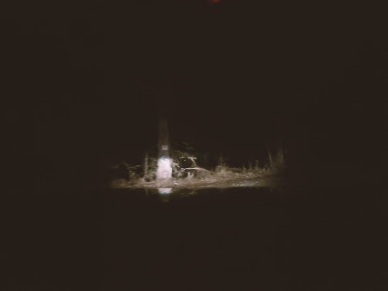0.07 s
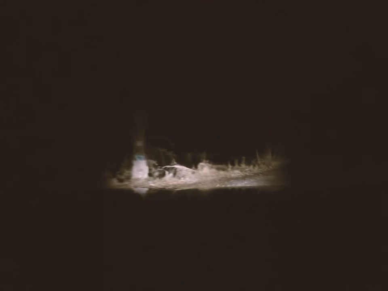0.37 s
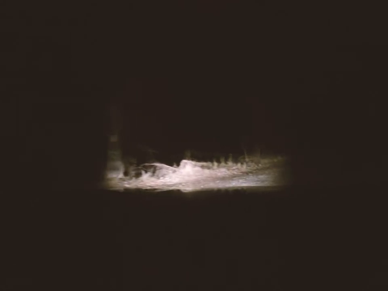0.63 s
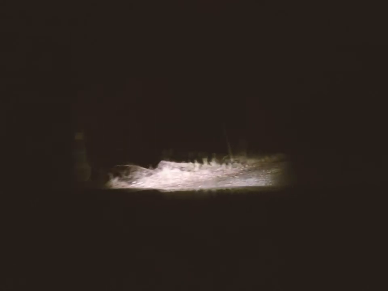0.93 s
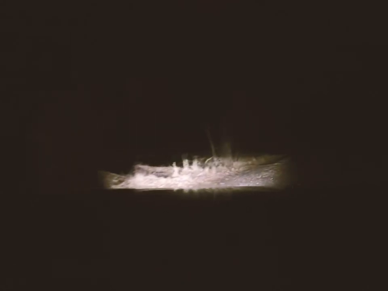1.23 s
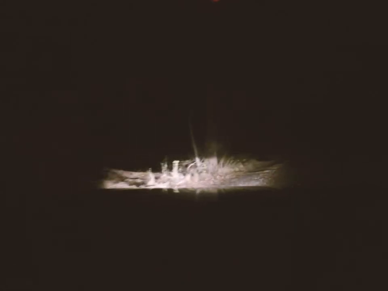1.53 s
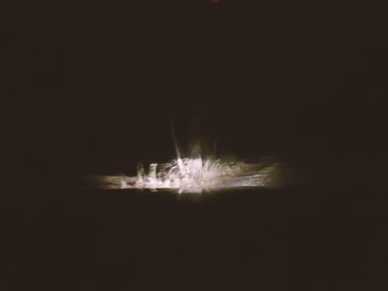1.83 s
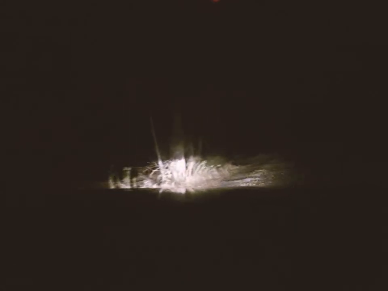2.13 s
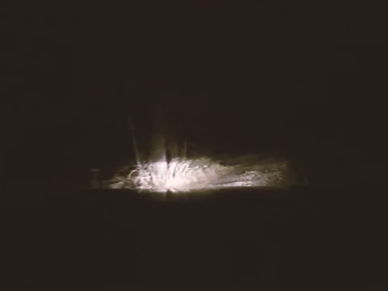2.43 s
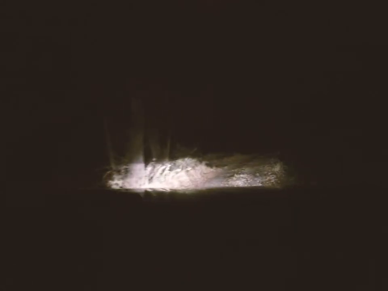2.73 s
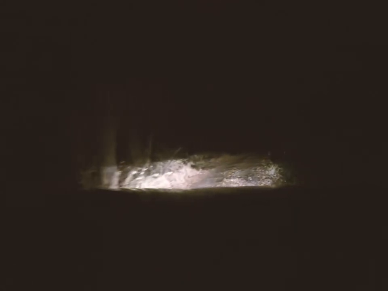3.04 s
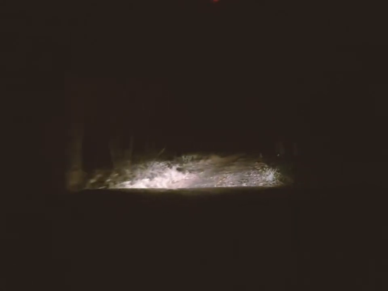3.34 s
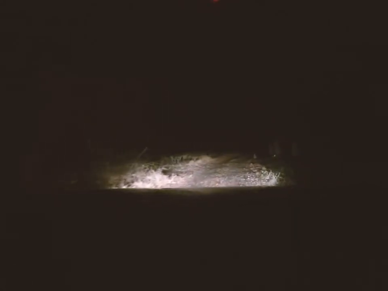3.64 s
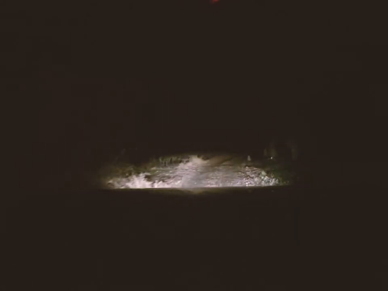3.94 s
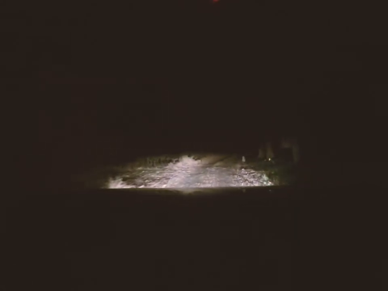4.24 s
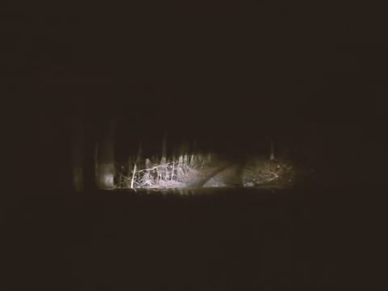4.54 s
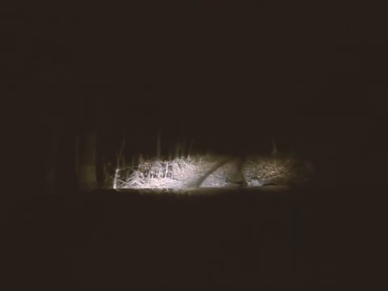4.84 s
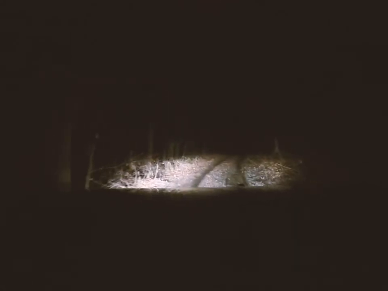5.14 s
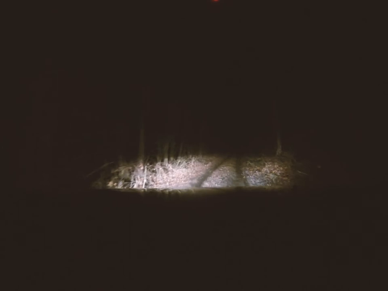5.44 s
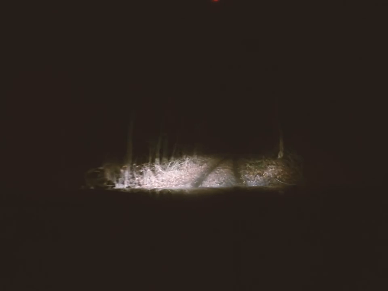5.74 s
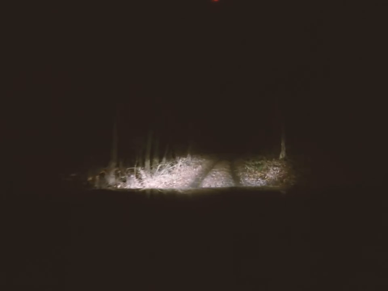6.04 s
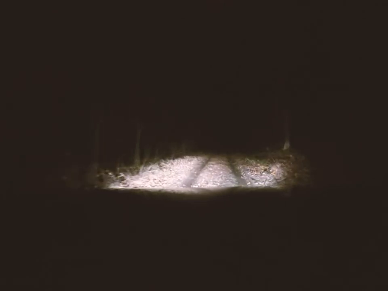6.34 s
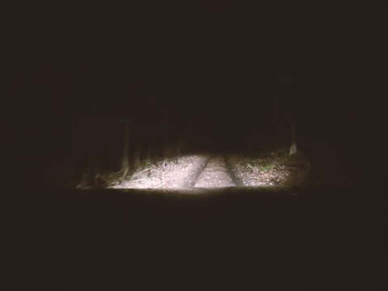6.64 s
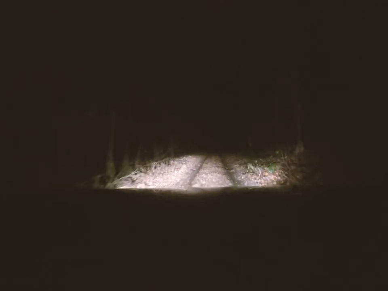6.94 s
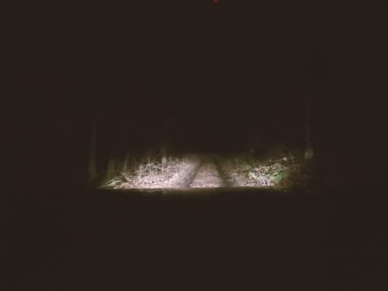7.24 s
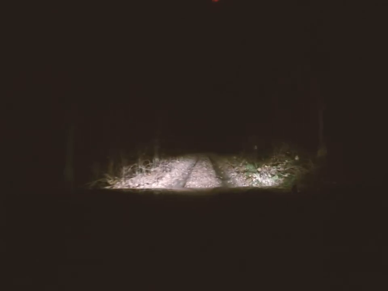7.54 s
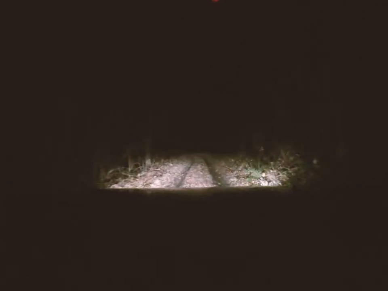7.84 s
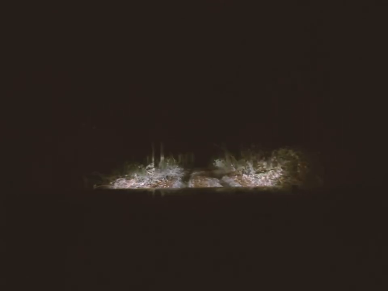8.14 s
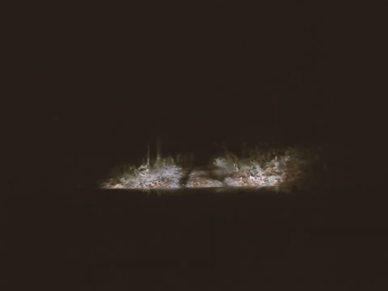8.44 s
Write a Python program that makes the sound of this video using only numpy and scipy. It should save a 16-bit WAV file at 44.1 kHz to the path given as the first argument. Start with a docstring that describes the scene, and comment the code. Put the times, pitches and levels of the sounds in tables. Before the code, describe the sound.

A vehicle crawls along a rough dirt trail, heard from the front seat. A loud, deep cabin boom throbs and swells over tyres rumbling on gravel and a faint engine hum. Bumps thud throughout, a loose latch clacks, something knocks on a hollow panel and plastic trim ticks and creaks softly. A loud dry pop comes about halfway. Near the end the suspension bottoms heavily in a rut, then the engine hum grows a little.

```python
"""An SUV's cabin booms and swells, heard from inside, at a crawl along a rough dirt trail.
Tyres rumble over gravel, the engine hums faintly, undergrowth brushes the doors. Bumps thud and rebound;
one deep rut bottoms the suspension. A loose latch clacks, fittings tick and chatter, cargo crunches and
knocks, trim sticks, slips and creaks. A camera motor whines thinly; a few dry pops sound, one loud."""
import sys
import numpy as np
from scipy import signal
from scipy.fft import rfft, irfft, next_fast_len
from scipy.io import wavfile
from scipy.ndimage import uniform_filter1d, minimum_filter1d

SR = 44100
rng = np.random.default_rng(int(sys.argv[2]) if len(sys.argv) > 2 else 0)


def to_wav(sig):
    """Store sig (one row per channel, or 1-D mono) as 16-bit WAV at the path in sys.argv[1].

    Samples outside -1..1 are clipped; the rate is SR.
    """
    pcm = np.clip(np.atleast_2d(sig), -1, 1) * 32767
    pcm = np.round(pcm).astype(np.int16)
    wavfile.write(sys.argv[1], SR, pcm.T)  # frames by channels


N = 383229
TIME_S = np.arange(N) / SR

# spectrum of plastic trim and fittings: freq_hz, density_db
PLASTIC_SPECTRUM = [(700, -11.5), (1100, 11.5), (1600, -7), (2000, 3.5), (2300, -3), (2750, 6), (3100, -2),
                    (3500, -1.5)]


def from_db(db):
    """Decibels to gain."""
    return 10 ** (np.asarray(db) / 20)


def unit_rms(x):
    """Scale to unit power."""
    return x / np.sqrt(np.mean(x ** 2) + 1e-20)


def curves(rows):
    """Interpolate rows (time_s, values...) to one curve per value column."""
    time_s, *columns = np.transpose(rows)
    return [np.interp(TIME_S, time_s, column) for column in columns]


def drift(rate_hz):
    """Slow random wander, rms 1."""
    hop, settle = 40, 2000
    pole = np.exp(-2 * np.pi * rate_hz * hop / SR)
    noise = rng.standard_normal(N // hop + settle + 2)
    slow = signal.lfilter([1], [1, -2 * pole, pole * pole], noise)[settle:]
    return np.interp(np.arange(N) / hop, np.arange(len(slow)), unit_rms(slow))


def coloured(x, spectrum):
    """Shape x by rows (freq_hz, density_db) with 36 dB/octave skirts; rms 1."""
    hz, db = np.transpose(spectrum)
    octave = np.log2(np.maximum(np.arange(N // 2 + 1) * SR / N, 1))
    outside = np.maximum(np.log2(hz[0]) - octave, 0) + np.maximum(octave - np.log2(hz[-1]), 0)
    gain = from_db(np.interp(octave, np.log2(hz), db) - 36 * outside)
    size = next_fast_len(N)
    gain = np.interp(np.arange(size // 2 + 1) / size, np.arange(N // 2 + 1) / N, gain)
    return unit_rms(irfft(rfft(x, size) * gain, size)[:N])


def evened(x, window_s):
    """Divide by the running rms to flatten swells."""
    power = uniform_filter1d(x ** 2, max(int(window_s * SR), 2))
    return x / np.sqrt(np.maximum(power, 0) + 1e-3)


def grains(per_s, spread_db):
    """Random tiny contacts of uneven size."""
    sizes = from_db(spread_db * np.minimum(rng.exponential(1, N), 4)) * rng.choice([-1, 1], N)
    return sizes * (rng.random(N) < per_s / SR)


def ring(clicks, hz, t60_s):
    """One mode: a unit click starts a decaying sine of height 1."""
    pole = np.exp(-np.log(1000) / (t60_s * SR))
    step_rad = 2 * np.pi * hz / SR
    return signal.lfilter([0, np.sin(step_rad)], [1, -2 * pole * np.cos(step_rad), pole * pole],
                          clicks + 1e-18)


def bursts(starts_s, levels_db, lengths_s, rise_s, decay_s):
    """Envelope of events that rise, hold and decay."""
    out = np.zeros(N)
    for start_s, db, length_s in zip(starts_s, levels_db, np.broadcast_to(lengths_s, len(starts_s))):
        start = max(int(start_s * SR), 0)
        age_s = TIME_S[:min(SR // 2, N - start)]
        attack = 1 - np.exp(-age_s / rise_s)
        release = np.exp(-np.maximum(age_s - length_s, 0) / decay_s)
        out[start:start + len(age_s)] += from_db(db) * attack * release
    return out


def wavering_sine(hz, wander_hz, rate_hz):
    """Sine with wandering pitch, rms 1."""
    cycles = np.cumsum(hz + wander_hz * drift(rate_hz)) / SR
    return np.sqrt(2) * np.sin(2 * np.pi * (cycles + rng.random()))


def repeated(rows, gap_s, loss_db):
    """Expand rows (start_s, level_db, ..., count) to columns of single, ever weaker blows."""
    blows = [(start_s + k * gap_s, db - k * loss_db, *rest)
             for start_s, db, *rest, count in rows for k in range(int(round(count)))]
    return np.transpose(sorted(blows))


def rubbed(rows, modes, slips_per_s, rise_s, decay_s, detune):
    """Tiny slips keep a part's modes ringing; each rub detunes them at random."""
    out, span = np.zeros(N), SR // 6
    for start_s, db, length_s in rows:
        slips = rng.choice([-1, 1], span) * (rng.random(span) < slips_per_s / SR)
        shifts = 1 + detune * rng.standard_normal(len(modes))
        tone = sum(from_db(mode_db) * unit_rms(ring(slips, hz * shift, t60_s))
                   for (hz, mode_db, t60_s), shift in zip(modes, shifts))
        rub = slice(int(start_s * SR), int(start_s * SR) + span)
        envelope = bursts([start_s], [db], length_s, rise_s, decay_s)[rub]
        out[rub] += envelope * evened(unit_rms(tone), .012)
    return out


def dulled(x, cutoff_hz):
    """A steep low-pass dulls the treble above the cutoff."""
    return signal.sosfilt(signal.butter(8, cutoff_hz, fs=SR, output="sos"), x + 1e-18)


def cabin_boom(shake_hz=22.2, boom_db=-1.53, swell_db=-4.5, shake_db=3.5, drum_db=-16.0, throb=.5):
    """The lowest air mode throbs and at times swells louder; the body shakes and the floor drums."""
    # cabin air mode: time_s, pitch_hz
    boom_pitch = [(0.45, 35.08), (0.7, 40.66), (0.9, 37.64), (2.7, 37.08), (3.1, 33.16), (3.27, 39.16),
                  (3.62, 34.95), (3.8, 42.63), (4.4, 42.3), (4.7, 35.99), (6.3, 36.05), (8.69, 39.31)]
    # boom kept up by uneven ground: time_s, level_db
    boom_level = [(0, -14), (0.55, -16), (0.8, -11.5), (1.7, -10), (2.15, -13.5), (2.68, -16.5),
                  (2.77, -22), (2.87, -18.5), (3.1, -18.5), (3.6, -12.5), (3.85, -10), (3.92, -15.5),
                  (3.98, -11.5), (4.1, -6.5), (4.2, -17.5), (4.55, -10.5), (5.8, -11), (6.1, -17.5),
                  (6.9, -14.5), (7.4, -12), (8.05, -13.5), (8.25, -18), (8.69, -13)]
    # body shaking on its springs: time_s, level_db
    shake_level = [(0.0, -15.5), (0.97, -30.5), (2.25, -12.5), (2.37, -35.5), (3.6, -17.5), (3.75, -30.5),
                   (5.91, -19), (6.02, -43), (6.39, -18.5), (7.07, -29.5), (7.36, -14), (7.96, -23.5),
                   (8.57, -19.5), (8.69, -45)]
    # louder swells of the low boom: start_s, level_db, length_s
    swells = [(0.142, -7.5, 0.039), (0.283, -9, 0.042), (1.205, -19, 0.024), (1.83, -11, 0.054),
              (2.275, -8.5, 0.38), (2.822, -11.5, 0.11), (3.106, -6.5, 0.028), (3.241, -6, 0.079),
              (3.41, -8.5, 0.14), (3.717, -9.5, 0.13), (4.222, -4.5, 0.054), (4.523, -6, 0.03),
              (5.726, -11.5, 0.036), (6.047, -5.5, 0.071), (6.294, -12, 0.085), (6.435, -9.5, 0.27),
              (6.884, -12, 0.052), (8.38, -18, 0.055)]
    # drumming floor: freq_hz, density_db
    floor_spectrum = [(44, -5.5), (52, 13.5), (64, -10), (80, -3.5), (88, -26)]
    pitch_hz, = curves(boom_pitch)
    ground_db, = curves(boom_level)
    body_db, = curves(shake_level)
    start_s, level_db, length_s = np.transpose(swells)
    envelope = from_db(ground_db + boom_db) * (1 + throb * evened(drift(17.2), 0.43))
    envelope += bursts(start_s, level_db + swell_db, length_s, rise_s=0.011, decay_s=.02)
    air = envelope * wavering_sine(pitch_hz, wander_hz=2.357, rate_hz=15.38)
    body = from_db(body_db + shake_db) * wavering_sine(shake_hz, wander_hz=2.305, rate_hz=6.36)
    drumming = evened(coloured(rng.standard_normal(N), floor_spectrum), 0.05)
    return air + body + np.sqrt(np.abs(envelope)) * from_db(drum_db) * drumming


def tyres(lumps_hz=5.2, lump_db=2.5, roar_db=-39.5, roar_follow=0.72, tick_db=-63.5, tick_follow=0.76):
    """Lumps lift rumble, tread roar, gravel and the ticking of fittings together, over a smooth hiss."""
    # ground under the tyres: time_s, rumble_db, gravel_db
    trail = [(0, -27, -54), (0.4, -33, -55), (0.7, -30, -51.5), (1.2, -30.5, -54), (2.05, -35.5, -56.5),
             (2.45, -34, -54), (2.8, -35.5, -58), (3.3, -29.5, -52), (3.8, -32, -52.5), (4.1, -31.5, -51),
             (4.55, -34, -53.5), (4.93, -25.5, -50.5), (5.0, -39.5, -59), (5.4, -34, -57),
             (5.6, -28.5, -51), (5.95, -35.5, -52.5), (6.28, -34.5, -53.5), (6.5, -30, -51.5),
             (6.95, -34, -53.5), (7.3, -30.5, -49.5), (7.85, -36, -57), (8.05, -30.5, -50.5),
             (8.69, -33, -50.5)]
    # fine grit and cabin air: time_s, level_db
    hiss_level = [(0.0, -59.5), (0.4, -59), (1.15, -60.5), (1.35, -64), (1.75, -59.5), (2.1, -65),
                  (2.44, -60), (2.78, -65.5), (3.3, -59.5), (3.88, -63), (4.11, -62), (4.85, -63),
                  (5.05, -65.5), (5.7, -62), (6.2, -65), (7.15, -61.5), (7.55, -62), (8.05, -60),
                  (8.69, -59.5)]
    # tyre rumble: freq_hz, density_db
    rumble_spectrum = [(76, -10), (86, 0), (100, 3), (126, -1), (138, -2), (152, -3.5), (178, -13),
                       (220, -31)]
    # tread roar: freq_hz, density_db
    roar_spectrum = [(140, -24.5), (185, 3.5), (220, 0), (280, -1.5), (320, -1.5), (350, -8.5), (480, -8),
                     (560, -17), (660, -26.5)]
    # crunching gravel: freq_hz, density_db
    gravel_spectrum = [(500, -1.5), (640, 5), (720, -1), (870, 2), (1000, -7.5), (1200, -10.5), (1500, -17)]
    # grit and air hiss: freq_hz, density_db
    hiss_spectrum = [(1000, -1.5), (1400, -2), (2100, -5), (2350, -3), (2750, -3.5), (3200, -4.5),
                     (3900, -7), (4700, -11), (6500, -14.5), (9000, -20.5), (15000, -32.5)]
    rumble_db, gravel_db = curves(trail) + lump_db * evened(drift(lumps_hz), 0.1)
    tread_db = roar_db + roar_follow * (rumble_db - rumble_db.mean())
    fittings_db = tick_db + tick_follow * (gravel_db - gravel_db.mean())
    hiss_db, = curves(hiss_level)
    rumble = from_db(rumble_db - 1) * evened(coloured(rng.standard_normal(N), rumble_spectrum), 0.034)
    roar = from_db(tread_db) * evened(coloured(grains(350, 2.6), roar_spectrum), 0.11)
    gravel = from_db(gravel_db - 1 + 2 * drift(7.2)) * coloured(grains(1200, 2.5), gravel_spectrum)
    tick_pole = np.exp(-1 / (.012 * SR))
    tick_envelope = signal.lfilter([1], [1, -tick_pole], np.abs(grains(40, .8)) + 1e-18)
    fittings = from_db(fittings_db) * tick_envelope * coloured(grains(1700, 2.6), PLASTIC_SPECTRUM)
    hiss = from_db(hiss_db) * coloured(rng.standard_normal(N), hiss_spectrum)
    return rumble + roar + gravel + fittings + hiss


def engine(low_flutter=0.17, high_flutter=.4, waver=0.004):
    """The hum's main note and neighbouring tones pass the bulkhead; the upper two flutter more."""
    # engine hum, main note: time_s, pitch_hz, note_db, octave_db
    hum = [(0, 170, -34, -48), (0.4, 168, -40, -48), (0.9, 154, -34, -47), (1.2, 156, -39, -39.5),
           (1.45, 156, -42, -52), (2.0, 150, -40, -52), (2.4, 156, -42, -42.5), (3.25, 168, -42, -41),
           (3.6, 177, -44, -49), (4.4, 182, -46, -54), (5.4, 150, -48, -55), (7.85, 181, -47, -53),
           (8.1, 177, -32.5, -51), (8.45, 173, -31.5, -50), (8.69, 169, -32, -48)]
    pitch_hz, note_db, octave_db = curves(hum)
    phase_rad = 2 * np.pi * np.cumsum(pitch_hz * (1 + waver * drift(8.5))) / SR
    note, octave = from_db(note_db), from_db(octave_db)
    tones = [(.75, .65 * note, low_flutter), (1, note, low_flutter),
             (1.5, .3 * octave, high_flutter), (2, octave, high_flutter)]
    return sum(gain * (1 + flutter * drift(30)) * np.sin(ratio * phase_rad)
               for ratio, gain, flutter in tones)


def camera_motor(buzz_hz=5640, buzz_db=-66.2, buzz_follow=1.2, octave_db=-17.0,
                 pulse_hz=29.97, first_s=.0088, width_s=.0046, rough_rad=.65):
    """Thin motor tones and a faint, rough buzz in regular pulses, each at a new phase."""
    # motor tones: pitch_hz, level_db
    partials = [(7103, -80), (10630, -96), (11838, -89.5), (14206, -95.5)]
    # swell of the whine: time_s, gain_db
    swell = [(0, 3), (0.6, 2.5), (1.05, 3), (1.35, -1), (1.75, 2.3), (1.97, -1.5), (2.35, 1.3),
             (2.72, -2.3), (3.3, 2.7), (3.85, -1.8), (4.15, -.5), (4.85, 0), (5.08, -5), (5.7, -2.2),
             (6.25, -4), (6.65, -2.7), (7.1, -.5), (7.6, -.5), (8.05, 3.3), (8.69, 3.7)]
    swell_db, = curves(swell)
    tones = sum(from_db(db) * wavering_sine(hz, wander_hz=1.4, rate_hz=2.7) for hz, db in partials)
    pulse, position = np.divmod((TIME_S - first_s) * pulse_hz + .5, 1)
    offset_cycles = rng.random(int(pulse[-1]) + 1)[pulse.astype(int)]
    phase_rad = 2 * np.pi * (buzz_hz * TIME_S + offset_cycles) + rough_rad * drift(150)
    envelope = np.exp(-((position - .5) / pulse_hz / width_s) ** 2)
    buzz = np.sqrt(2) * envelope * (np.sin(phase_rad) + from_db(octave_db) * np.sin(2 * phase_rad))
    return from_db(swell_db) * tones + from_db(buzz_follow * swell_db + buzz_db + 1.5 * drift(10)) * buzz


def undergrowth():
    """Leaves and twigs slide softly along the doors."""
    # brushes: start_s, level_db, length_s
    swishes = [(0.082, -70, 0.32), (1.08, -68, 0.12), (3.412, -65.5, 0.35), (7.728, -63, 0.094)]
    # sliding leaves: freq_hz, density_db
    leaf_spectrum = [(2500, -3), (4200, -4), (6000, -2), (7500, -8.5), (10000, -21)]
    envelope = bursts(*np.transpose(swishes), rise_s=0.0096, decay_s=0.026)
    return envelope * coloured(grains(7700, 2.4), leaf_spectrum)


def suspension(thud_gain_db=-8.5, rebound_s=0.032, rebound_db=-13.5):
    """Each bump gives a dull thud and a short body clatter; the wheel lands again, weaker."""
    # hits on ruts and roots: start_s, thud_db, clatter_db
    hits = [(0.647, -18.5, -42.5), (0.735, -29, -45), (0.775, -30, -48), (1.321, -27, -39.5),
            (1.481, -41, -61.5), (1.603, -31, -43), (1.647, -24, -45), (1.747, -23, -38.5),
            (2.44, -25, -43), (3.45, -34, -46), (4.248, -28, -44), (4.88, -26, -55), (5.219, -26.5, -46),
            (5.5, -33, -44.5), (5.556, -24.5, -43.5), (6.396, -26.5, -41), (5.731, -38.5, -45.5),
            (6.461, -17.5, -41.5), (6.919, -32, -45.5), (7.281, -24, -50), (7.712, -33, -42.5)]
    # thud: freq_hz, density_db
    thud_spectrum = [(60, -9.5), (105, -1.5), (180, 6.5), (270, 5), (340, -1.5), (480, 0.5), (600, -13.5),
                     (800, -35)]
    # body clatter: freq_hz, density_db
    clatter_spectrum = [(400, -39), (570, 3.5), (700, 3.5), (880, 2.5), (1300, -12.5), (2000, -23),
                        (4000, -33)]
    rebounds = np.array(hits) + [rebound_s, rebound_db, rebound_db]
    start_s, thud_db, clatter_db = np.vstack([hits, rebounds]).T
    thud = bursts(start_s, thud_db + thud_gain_db, 0.0078, rise_s=0.0011, decay_s=0.02)
    thud *= evened(coloured(rng.standard_normal(N), thud_spectrum), 0.0084)
    clatter = bursts(start_s, clatter_db, 0.0088, rise_s=0.0025, decay_s=0.018)
    clatter *= evened(coloured(grains(2000, 0.54), clatter_spectrum), 0.0032)
    return thud + clatter


def latch(ring_db=-6.5, clack_db=-10.0, jangle_db=-16.0, edge_db=0.5, scatter_db=2.0,
          second_s=0.00599, second_loss_db=6.5, echo_s=.00812, echo_db=-12.5):
    """A loose latch lands with a sharp edge, clacks, jangles and rings; the cabin returns one echo."""
    # landings: start_s, level_db, brightness_db
    landings = [(0.652, -51, -28), (0.861, -38.5, -20.5), (1.607, -33, -28), (1.648, -47, -23),
                (1.752, -46, -26), (4.277, -29, -18.5), (4.339, -38, -32), (5.175, -36, -32),
                (5.809, -31, -24.5), (5.853, -39.5, -29), (5.897, -36, -28), (6.424, -32, -23),
                (6.825, -32, -29), (6.880, -43.5, -26), (7.284, -24.5, -21), (7.353, -28, -21.5),
                (7.710, -26.5, -25.5)]
    # latch modes: pitch_hz, level_db, t60_s
    modes = [(330.6, -2.5, 0.11), (413, 4, 0.14), (526, 3, 0.056), (670, -6.5, 0.05), (821, -4, 0.074),
             (968, 3, 0.07)]
    # clack: freq_hz, density_db
    clack_spectrum = [(300, -0.5), (450, 1), (700, -2.5), (960, 10.5), (1080, -3), (1600, 1), (2000, -1),
                      (2500, -14.5), (3100, -14.5), (3600, -26)]
    # modes of its small parts: pitch_hz, level_db, t60_s
    jangle_modes = [(1200, -6.5, .012), (1420, 1, .02), (1640, 1, 0.023), (1870, 0, .025), (2130, -3, .02),
                    (2860, -10, .015)]
    # contact edge: freq_hz, density_db
    edge_spectrum = [(2200, -5), (3000, 3), (4000, -3.5), (5100, -3), (6000, -6), (7000, -9), (8000, -17.5),
                     (10000, -39.5)]
    start_s, level_db, brightness_db = np.transpose(landings)
    ringing = np.zeros(N)
    for hz, mode_db, t60_s in modes:
        blows = np.zeros(N)
        # two contacts, scattered in time and strength per mode
        for delay_s, loss_db in ((0, 0), (second_s, second_loss_db)):
            jitter_ms, strength = rng.standard_normal((len(start_s), 2)).T
            starts = ((start_s + delay_s + .001 * jitter_ms) * SR).astype(int)
            blows[starts] += from_db(level_db - loss_db + scatter_db * np.tanh(strength))
        ringing += from_db(mode_db + ring_db) * ring(blows, hz, t60_s)
    clack = bursts(start_s - .003, level_db + clack_db, 0.011, rise_s=0.002, decay_s=.0055)
    clack *= evened(coloured(grains(3000, 1.1), clack_spectrum), 0.02)
    rubs = [(at_s, db + jangle_db, second_s) for at_s, db in zip(start_s, level_db)]
    jangle = rubbed(rubs, jangle_modes, slips_per_s=2000, rise_s=.001, decay_s=.007, detune=.04)
    edge = bursts(start_s - .004, level_db + brightness_db + edge_db, 0.0068, rise_s=.0006, decay_s=.006)
    edge *= evened(coloured(grains(6600, 2.2), edge_spectrum), 0.014)
    direct = ringing + clack + jangle
    echo = from_db(echo_db) * np.pad(direct, (int(echo_s * SR), 0))[:N]
    return direct + echo + edge


def fittings_chatter(gain_db=-1.5):
    """Loose fittings buzz in runs of small contacts, each run at its own pitches."""
    # runs on rough ground: start_s, level_db, length_s
    runs = [(0.765, -56, .02), (0.812, -55.5, .02), (1.09, -59, .03), (1.372, -62, .012),
            (2.283, -63, .025), (3.84, -56, .008), (4.14, -54, .012), (4.672, -57, .012), (5.12, -59, .014),
            (5.188, -61, .01), (5.224, -55, 0.011), (5.275, -62, .02), (5.328, -58, .04),
            (5.422, -60, .014), (5.668, -55.5, .03), (5.745, -50.5, 0.014), (6.765, -58.5, 0.11),
            (7.14, -55.5, 0.13), (7.425, -62, 0.056), (7.585, -57, .015)]
    # fitting modes: pitch_hz, level_db, t60_s
    modes = [(1850, 0.5, .01), (2350, -1.5, .008), (2600, 0, .012), (3250, -2.5, .01), (3830, -6.5, .01)]
    buzz = rubbed(runs, modes, slips_per_s=600, rise_s=.004, decay_s=.007, detune=.05)
    return from_db(gain_db) * dulled(buzz, cutoff_hz=4600)


def plastic_taps():
    """Hard plastic parts meet in short bright ticks."""
    # taps: start_s, level_db, length_s
    taps = [(1.174, -55, 0.0022), (2.017, -54, .003), (2.622, -52.5, .001), (4.071, -44.5, 0.0038),
            (4.506, -57, 0.0042), (4.582, -57, 0.00097), (4.747, -54, .004), (5.545, -56, 0.0019),
            (5.571, -56, .001), (5.708, -52, .002), (6.881, -57, 0.0019), (7.694, -47.5, .002),
            (8.187, -51, .003)]
    # plastic modes: pitch_hz, level_db, t60_s
    modes = [(2800, 0.5, .005), (3740, 0.5, .006), (5100, -4, .004), (6160, -11, .004)]
    ticks = rubbed(taps, modes, slips_per_s=5000, rise_s=.0003, decay_s=.003, detune=.05)
    return dulled(ticks, cutoff_hz=7800)


def cargo_crunch(gain_db=1.5):
    """Loose cargo grinds against itself and stops short."""
    # cargo shifts: start_s, level_db, length_s
    shifts = [(1.293, -50, 0.007), (2.824, -57, .008), (3.062, -53, .01), (4.0, -53.5, 0.0098),
              (4.247, -47, 0.006), (5.545, -55, .015), (6.371, -46, 0.0082), (6.407, -47, 0.029),
              (6.457, -45.5, 0.035), (7.1, -58, .015), (7.988, -53, 0.008), (8.186, -52, 0.0051)]
    # cargo modes: pitch_hz, level_db, t60_s
    modes = [(1280, -1.5, 0.006), (1680, 1, 0.0058), (2040, 3.5, 0.0076), (2790, 5.5, 0.0055),
             (3300, -2.5, 0.018), (3670, -9.5, 0.012), (4200, -12.5, .02)]
    crunch = rubbed(shifts, modes, slips_per_s=1500, rise_s=.0015, decay_s=.007, detune=.015)
    return from_db(gain_db) * dulled(crunch, cutoff_hz=4200)


def trim_chafe(panel_db=-7.5, top_gain_db=6.0, ring_db=3.0, t60_s=0.021):
    """Plastic panels stick and slip in dry bursts; each spot rings at its own pitches."""
    # chafing spots: start_s, level_db, top_relative_db, burst_count
    chafes = [(1.33, -54, -22, 2), (1.713, -54, -9, 1), (2.235, -51.5, -19, 2), (2.545, -52, -20, 1),
              (3.155, -58.5, -11, 2), (3.408, -52, -17, 1), (3.945, -51.5, -16, 1), (4.08, -57, -14, 1),
              (4.126, -51.5, -30.5, 1), (4.54, -58, -15, 2), (4.752, -60, -17, 1), (4.823, -52, -31, 2),
              (5.487, -53, -21, 1), (5.708, -48.5, -26, 1), (6.054, -54, -18, 3), (6.605, -51, -16.5, 1),
              (7.98, -52, -20, 1)]
    # upper band of the chafing: freq_hz, density_db
    top_spectrum = [(2400, -6), (2750, -8.5), (3200, -12.5), (3650, -6), (4050, -1.5), (4500, -11.5),
                    (5300, -3.5), (6100, -9), (7500, -23.5)]
    start_s, level_db, top_db = repeated(chafes, gap_s=.041, loss_db=2)
    length_s = 0.023
    slips = grains(600, 2.5)
    spot = np.searchsorted(start_s, TIME_S) - 1
    pitches_hz = np.geomspace(1600, 3650, num=12)
    excited = rng.random((len(start_s), len(pitches_hz))) < .4
    ringing = sum(ring(slips * excited[spot, k], hz, t60_s) for k, hz in enumerate(pitches_hz))
    chafe = evened(coloured(slips, PLASTIC_SPECTRUM), 0.044)
    chafe += from_db(ring_db) * evened(unit_rms(ringing), 0.023)
    panel = bursts(start_s, level_db + panel_db, length_s, rise_s=.001, decay_s=.013) * chafe
    top = bursts(start_s, level_db + top_db + top_gain_db, length_s, rise_s=.001, decay_s=.018)
    top *= evened(coloured(slips, top_spectrum), .02)
    return panel + top


def hollow_knocks(gain_db=-4.5, detune=0.045, peak_s=.009):
    """Something loose in the back bounces softly on a hollow panel, which rings briefly."""
    # knocks: start_s, level_db, pitch_hz, bounce_count
    knocks = [(1.395, -30.5, 469, 3), (2.44, -30.5, 644, 1), (3.63, -29, 456, 2), (3.803, -31.5, 471.3, 2),
              (4.054, -28, 467, 1), (4.175, -30.5, 466.7, 1), (4.676, -28.5, 473, 4),
              (4.822, -32.5, 481, 3), (6.163, -36.5, 458.1, 1), (6.246, -30, 469, 1), (6.347, -35, 460, 2),
              (6.459, -23.5, 565, 1), (6.552, -29, 450, 1), (6.637, -28.5, 459, 2),
              (7.622, -29.5, 472.8, 1), (7.757, -28, 455.5, 1)]
    out = np.zeros(N)
    age_s = TIME_S[:SR // 12]
    envelope = (age_s / peak_s) ** 2 * np.exp(2 - 2 * age_s / peak_s)
    for start_s, level_db, pitch_hz in repeated(knocks, gap_s=0.029, loss_db=1.5).T:
        start = int(start_s * SR)
        tone = np.sin(2 * np.pi * pitch_hz * (1 + detune * rng.standard_normal()) * age_s)
        out[start:start + len(age_s)] += from_db(level_db + gain_db) * envelope * tone
    return out


def joint_creaks():
    """A tight panel joint sticks and slips, singing briefly."""
    # creaks: start_s, level_db, length_s
    creaks = [(1.785, -54, 0.032), (2.017, -56, 0.033), (2.478, -53.5, 0.024), (2.724, -54, 0.024),
              (3.44, -52.5, 0.031), (4.172, -55.5, 0.051)]
    # panel modes: pitch_hz, level_db, t60_s
    modes = [(2630, -2.5, 0.022), (2950, -7.5, .012), (3900, -4.5, 0.0084), (5070, -16, .008)]
    song = rubbed(creaks, modes, slips_per_s=900, rise_s=.005, decay_s=.008, detune=.01)
    return dulled(song, cutoff_hz=7100)


def pops():
    """The signal jumps and settles: one loud pop and some small crackles."""
    # dry pops: start_s, height, decay_s, cutoff_hz
    jumps = [(1.836, -0.05, 0.0005, 1900), (2.607, -0.036, 0.00099, 2490), (4.429, -0.35, 0.0025, 15000),
             (4.9366, -0.13, 0.0017, 1290), (4.953, 0.037, 0.00028, 4900)]
    out = np.zeros(N)
    for start_s, height, decay_s, cutoff_hz in jumps:
        jump = height * (TIME_S >= start_s) * np.exp(-np.abs(TIME_S - start_s) / decay_s)
        pole = np.exp(-2 * np.pi * cutoff_hz / SR)
        out += signal.lfilter([1 - pole], [1, -pole], jump + 1e-18)
    return out


def bottoming(contact_hz=260):
    """Rubber bump stops set the floor pan ringing while the body grinds through a deep rut."""
    # bump stop contacts: start_s, level_db
    jolts = [(7.140, -10), (7.155, -11), (7.218, -24)]
    # floor pan modes: pitch_hz, level_db, t60_s
    modes = [(73.4, 4.5, 0.13), (111.44, 3.5, 0.14), (186, -6, 0.059), (276, -9.5, 0.087), (322, -10, .12)]
    # grind through the rut: start_s, level_db, length_s
    rut = [(7.13, -21.5, 0.11)]
    # its dull roll: freq_hz, density_db
    roll_spectrum = [(80, -3), (112, 8.5), (145, 1), (180, 10), (225, -4), (325, 0), (400, -8.5), (480, -7),
                     (560, -20), (700, -25.5), (900, -28), (1200, -39)]
    start_s, level_db = np.transpose(jolts)
    blows = np.zeros(N)
    blows[(start_s * SR).astype(int)] = from_db(level_db)
    push = signal.sosfilt(signal.butter(2, contact_hz, fs=SR, output="sos"), blows + 1e-18)
    floor_pan = sum((-1) ** k * from_db(mode_db) * ring(push, hz, t60_s)
                    for k, (hz, mode_db, t60_s) in enumerate(modes))
    roll = bursts(*np.transpose(rut), rise_s=0.0063, decay_s=0.016)
    roll *= evened(coloured(rng.standard_normal(N), roll_spectrum), 0.035)
    return floor_pan + roll


def scene():
    """Mono mix at the front seat."""
    bumps = suspension() + bottoming() + hollow_knocks()
    rattles = latch() + trim_chafe() + plastic_taps() + fittings_chatter() + joint_creaks() + cargo_crunch()
    driving = cabin_boom() + tyres() + engine() + undergrowth()
    return (bumps + rattles + driving + camera_motor() + pops())[None]


def record(dry, ceiling=.89, stopband_hz=16800):
    """A smooth limiter holds down the biggest peaks; a steep low-pass cuts the top."""
    window = SR // 25
    needed_gain = np.minimum(1, ceiling / (np.abs(dry) + 1e-9))
    gain = uniform_filter1d(minimum_filter1d(needed_gain, window), window)
    return signal.sosfilt(signal.cheby2(12, 70, stopband_hz, fs=SR, output="sos"), dry * gain)


dry = scene()
out = record(dry)
to_wav(out)
```